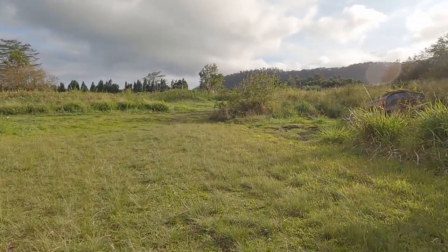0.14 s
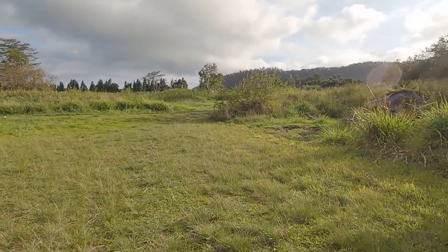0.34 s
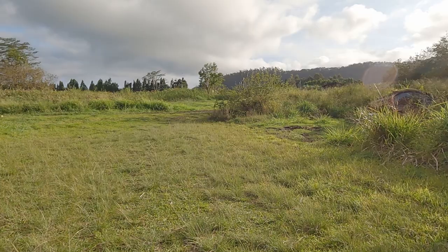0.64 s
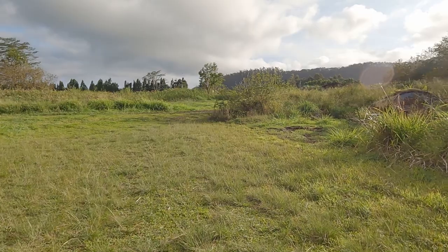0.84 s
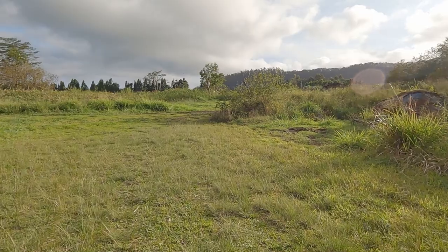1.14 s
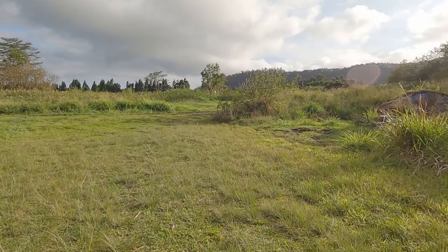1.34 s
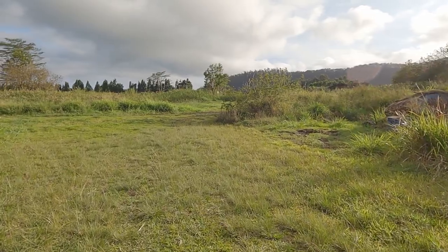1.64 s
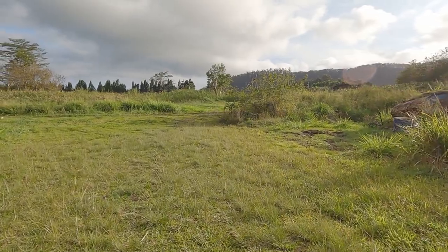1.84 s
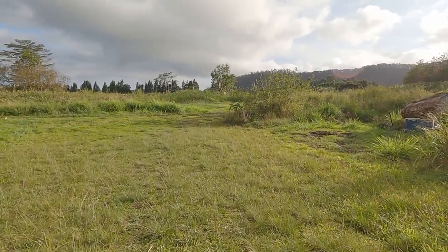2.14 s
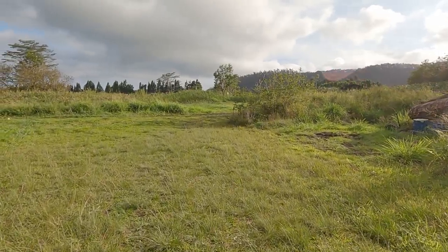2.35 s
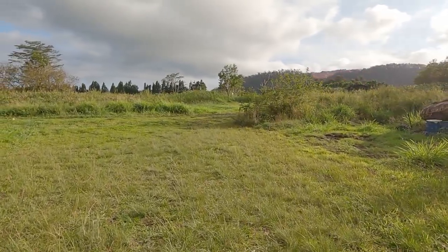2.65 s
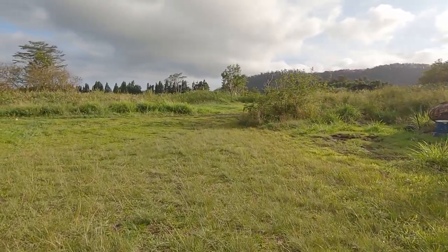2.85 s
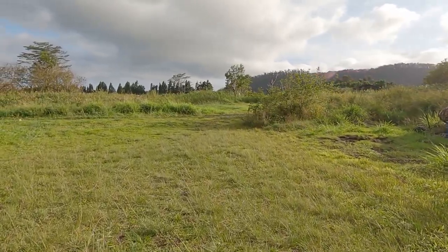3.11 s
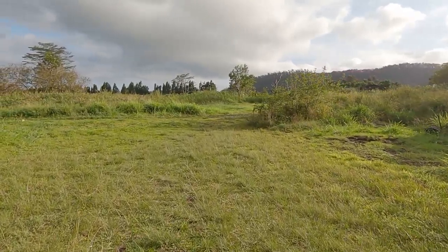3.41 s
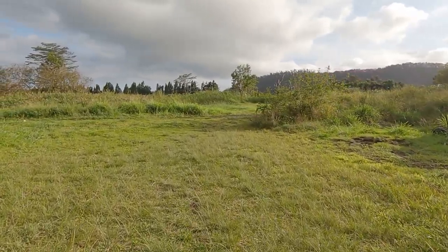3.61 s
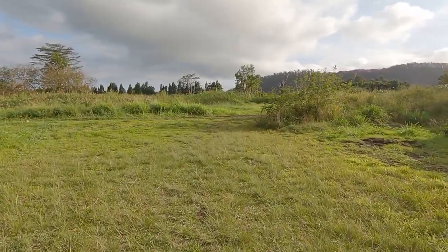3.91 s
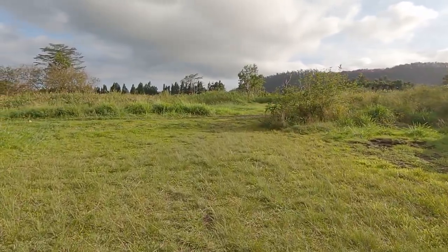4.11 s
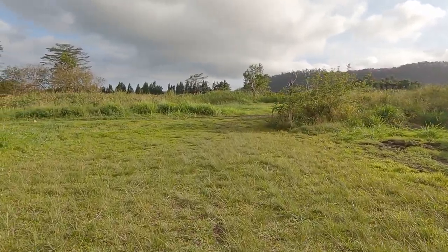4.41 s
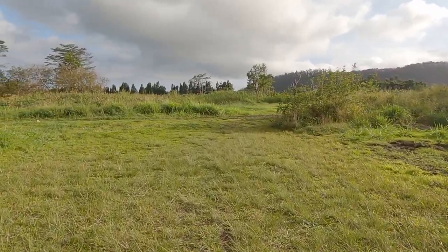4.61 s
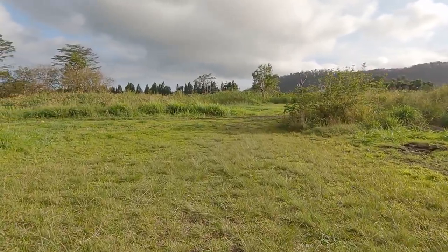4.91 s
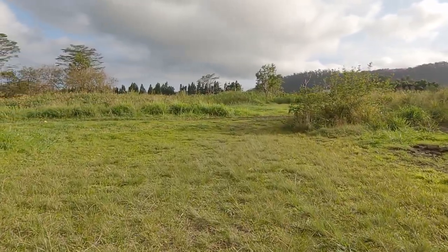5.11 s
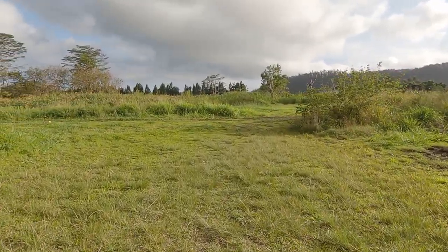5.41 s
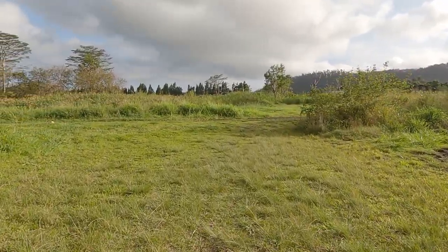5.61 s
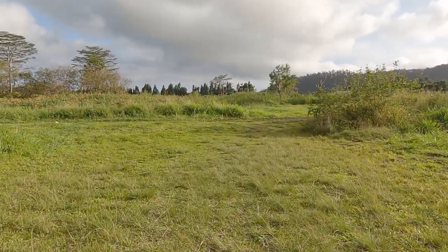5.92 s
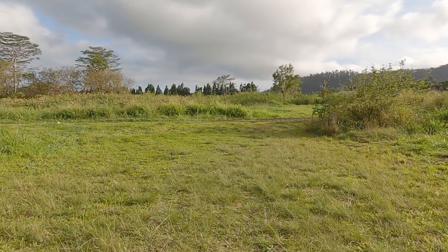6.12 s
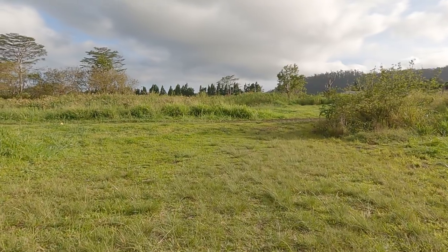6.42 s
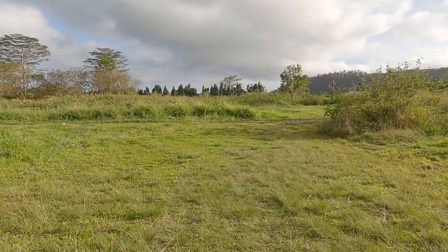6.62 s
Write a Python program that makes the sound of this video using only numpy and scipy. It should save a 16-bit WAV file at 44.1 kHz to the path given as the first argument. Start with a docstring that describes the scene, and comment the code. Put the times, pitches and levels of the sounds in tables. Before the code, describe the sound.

Someone walks through dry grass with steady swishes and small crackles while songbirds whistle and a cricket trills; a tuft crunches with a sharp click.

```python
"""Grassy field: a walker crosses it with a small camera. Legs swish through blades (shaped noise and grains),
stems crackle, tick and snap (damped tones), a dry tuft is crushed and one hard click sounds.
Footfalls sway the handle and bumps thud in the body (decaying sines).
Songbirds whistle gliding sines to the right, with chirps and hoarse far calls; a cricket trills in
short tones. A far low hum and a faint air hiss (filtered noise) lie under it all."""
import sys
import numpy as np
from scipy import signal
from scipy.fft import rfft, irfft, next_fast_len
from scipy.io import wavfile
from scipy.ndimage import uniform_filter1d, map_coordinates

SR = 44100
rng = np.random.default_rng(int(sys.argv[2]) if len(sys.argv) > 2 else 0)


def undo_db(level):
    """Turn decibels back into plain size, where 20 dB means ten times bigger."""
    steps = np.asarray(level, float) / 20
    return 10 ** steps


def store_wav(level_fs):
    """Save 16-bit WAV to argv[1]."""
    pcm = np.round(np.clip(np.atleast_2d(level_fs), -1, 1) * 32767)
    wavfile.write(sys.argv[1], SR, pcm.T.astype(np.int16))


N = 297675
T = np.arange(N) / SR


def unit(x):
    """Scaled to rms 1."""
    return x / np.sqrt(np.mean(x ** 2) + 1e-20)


def along(points, hz):
    """(f/Hz, value) points read on a log axis."""
    f, v = np.transpose(points)
    return np.interp(np.log(hz + 1), np.log(f + 1), v)


def curves(rows):
    """One value per sample for each column after the time."""
    s, *cols = np.transpose(rows)
    return [np.interp(T, s, c) for c in cols]


def wobble(knots_per_s):
    """Smooth random curve."""
    knots = rng.standard_normal(int(N * knots_per_s / SR) + 4)
    return map_coordinates(knots, [T * knots_per_s])


def filtered(x, response):
    """x times a complex response of frequency."""
    m = next_fast_len(N + 8192)
    spectrum = rfft(x, m) * response(np.fft.rfftfreq(m, 1 / SR))
    return irfft(spectrum, m)[..., :N]


def shaped_noise(spectrum):
    """Two independent noises with the spectrum (f/Hz, level/dB)."""
    return filtered(rng.standard_normal((2, N)), lambda hz: undo_db(along(spectrum, hz)))


def placed(x, left_db, lag_us):
    """One source at both ports: left louder by left_db and late by lag_us."""
    def half(hz):
        return undo_db(left_db / 2) * np.exp(-1j * np.pi * hz * lag_us * 1e-6)

    return filtered(x, lambda hz: np.array([half(hz), 1 / half(hz)]))


def wide(pair, alike, side):
    """Two unrelated sounds mixed to a left-right likeness and balance for each frequency."""
    def turn(hz):
        return np.arccos(np.clip(along(alike, hz), -1, 1)) / 2

    def lead(hz):  # left port nearer by 12 us
        return along(side, hz) * np.log(10) / 20 + 2j * np.pi * hz * 12e-6

    a, b = filtered(pair, lambda hz: np.array([np.cos(turn(hz)), np.sin(turn(hz))]))
    return filtered(np.array([a + b, a - b]), lambda hz: np.exp(np.outer([.5, -.5], lead(hz))))


def add(x, s, piece):
    """Adds a piece into x from time s."""
    i = round(s * SR)
    x[..., i:i + piece.shape[-1]] += piece[..., :N - i]


# hum spectrum before scaling: [f/Hz, level/dB]
HUM_SPECTRUM = [(8.8, -50), (15, -21), (43, 0.5), (91, -29), (140, -2), (184, 2.5), (318, -4), (700, -17),
                (910, -40), (1540, -120)]
# mean hum level: [t/s, level/dB]
HUM_LEVEL = [(0, -60.5), (.7, -64.5), (1.05, -55.5), (1.4, -63.5), (2.1, -65), (2.4, -58.5), (3.25, -65),
             (3.7, -57.5), (4.7, -65.5), (5.1, -59), (5.85, -63), (6.3, -56.5), (6.75, -62.5)]


def hum():
    """Far hum: low noise reaching the right port early, with an opposed, unrelated part at the two ports."""
    a, b = shaped_noise(HUM_SPECTRUM)
    pair = unit(placed(a, left_db=-11.5, lag_us=1100) + .65 * np.array([b, -b]))
    return undo_db(curves(HUM_LEVEL)[0] + 2.06 * wobble(9)) * pair


SWELL_DB, FADE_DB = 8.5, 7.5  # rise of a note to its peak, fall from it


def whistles(notes, flutter_db, rough_hz):
    """Each note is a gliding sine with soft ends, unsteady from the air it crosses."""
    out = np.zeros(N)
    flutter = undo_db(flutter_db * (wobble(70) + 0.46 * wobble(25)))
    drift_hz = rough_hz * wobble(150)
    for s, length, db, hz, peak in notes:
        t = T[:round(length * SR)]
        place = t / length
        glide_hz = map_coordinates(np.array(hz, float), [place * (len(hz) - 1)], mode="nearest")
        pitch_hz = glide_hz + drift_hz[round(s * SR):][:len(t)]
        peak = np.clip(peak, .02, .98)
        level_db = np.interp(place, [0, peak, 1], [db - SWELL_DB, db, db - FADE_DB])
        ends = np.clip(np.minimum(t, length - t) / 0.0026, 0, 1)
        tone = np.sin(2 * np.pi * np.cumsum(pitch_hz) / SR)
        add(out, s, np.sqrt(2) * ends * undo_db(level_db) * tone)
    return out * flutter


def midway(calls):
    """Calls given a peak just past the middle."""
    return [(*row, 0.56) for row in calls]


# songbird notes: [t/s, length/s, peak level/dB, f/Hz at even steps, place of peak 0-1]
SONG_NOTES = [(0, .21, -47.5, [2030, 2250, 2496, 2655, 2713], .75),
              (.28, 0.15, -49, [2670, 2615, 2426, 2465, 2570], 0.38),
              (.482, 0.13, -49, [3260, 3205, 3130, 3070, 3500], 0.4),
              (.73, 0.36, -48, [1804, 1953, 2263, 2560, 2678, 2690], 0.73),
              (1.195, .155, -49.5, [2540, 2470, 2366, 2461, 2580], 0.15),
              (1.4, 0.1, -44, [3300, 3170, 2920], 0.6), (1.525, .045, -51, [3080, 3170], .5),
              (1.58, .12, -55, [3230, 3480, 3480, 3400], .5),
              (1.66, .31, -47, [1739, 1887, 2022, 2350, 2574, 2696], 1),
              (2.5, .12, -54, [1990, 1870, 1833, 2440], .5), (2.62, .12, -53.5, [2560, 2720, 2700], 0.56),
              (2.8, 0.18, -43.5, [2460, 2710, 2780, 2800, 2880], 0.22),
              (2.845, .105, -52, [1967, 1850, 1790, 2450], .6), (2.98, 0.097, -48, [2640, 2790, 2810],
              0.46), (3.115, 0.097, -50.5, [1830, 1950, 1890, 1720], .7),
              (3.34, 0.092, -43.5, [2790, 2896, 3010, 3045, 3230], .3), (3.48, .045, -58, [3071, 3760], .5),
              (3.545, .07, -51, [3800, 3860], .8), (3.62, .09, -46, [3750, 3290, 3150, 3130], 1),
              (3.645, 0.16, -51.5, [2030, 2007, 1825, 1730, 1640], 0.13),
              (3.87, 0.088, -47.5, [1956, 2480, 2960, 3313], .8),
              (3.92, .26, -50, [2268, 2227, 2180, 2190, 2125], 0.55), (4.255, .03, -51, [3400, 3150], 0.3),
              (4.34, 0.32, -48, [2590, 2675, 2687, 2560, 2530], 0.64),
              (4.89, .13, -46, [2415, 2430, 2180, 1955, 1815], 0.14),
              (5.745, 0.22, -46.5, [2694, 2560, 2514, 2600, 2695, 2910], 0.42),
              (5.965, 0.16, -48, [3105, 2868, 2880, 2833, 2770], 0.02),
              (6.17, .26, -53.5, [3050, 3010, 3040, 3100, 3150], 0.24),
              (6.18, .18, -44.5, [2330, 2590, 2525, 2340, 2010, 1760], .25),
              (6.43, .19, -48.5, [3130, 3126, 3135, 3100, 3430], .7),
              (6.515, 0.088, -49.5, [2124, 2650, 3100, 3662], .8)]


def song():
    """Songbirds: long gliding whistles."""
    return whistles(SONG_NOTES, flutter_db=2.0, rough_hz=25.2)


# far calls: [t/s, length/s, peak level/dB, f/Hz at even steps]
FAR_CALLS = [(.27, 0.056, -57, [3200, 3350, 3700]), (.59, 0.068, -56, [3420, 3600, 3300]),
             (.94, .1, -57, [3400, 3550, 3710]), (2.2, 0.123, -59, [2350, 2400, 2330]),
             (3.27, .06, -52, [2900, 2850]), (5.136, 0.047, -52.5, [2640, 2440]),
             (5.21, .12, -53, [2350, 2670, 2600]), (5.329, 0.071, -58, [3100, 2933]),
             (5.6, 0.093, -59.5, [2500, 2040, 2020]), (6.299, .15, -59.5, [3190, 3230, 3000])]


def far_calls():
    """Hoarse calls blurred by distance: strong pitch drift, little flutter."""
    return whistles(midway(FAR_CALLS), flutter_db=0.8, rough_hz=89.4)


# small birds ahead: [t/s, length/s, peak level/dB, f/Hz at even steps]
CHIRP_NOTES = [(.3, 0.077, -55.5, [4480, 3420]), (0.512, .04, -54, [4200, 4000]),
               (0.961, 0.066, -58, [5700, 5000, 5300]), (1.047, .075, -52.5, [4140, 4100]),
               (1.13, .05, -65, [4300, 4100]), (1.181, .06, -52, [7100, 5000, 4200, 4000]),
               (1.599, .065, -52.5, [4940, 4400, 3600]), (1.678, 0.027, -54, [3800, 4100]),
               (1.882, 0.061, -63, [4300, 4000, 3900]), (2.307, 0.043, -59.5, [4100, 2800]),
               (2.405, .025, -66, [7300, 5165]), (2.448, .03, -60, [4350, 4000]),
               (2.546, 0.078, -57.5, [4260, 4200, 4420]), (2.899, .019, -53.5, [6400, 7400, 7800]),
               (3.026, 0.062, -60, [3446, 3550, 3400]), (3.523, 0.092, -56.5, [4452, 4440, 4400, 3900]),
               (4.922, 0.032, -50.5, [2300, 3050, 3140]), (5.031, .022, -54.5, [7050, 7500, 7300]),
               (6.14, 0.037, -58, [4200, 4500, 4800]), (6.336, .045, -56, [4700, 4150, 4000]),
               (6.404, 0.047, -59, [4220, 4120]), (6.5, .03, -64, [6450, 6400]),
               (6.538, 0.095, -59, [5280, 5200, 4400, 3930])]


def chirps():
    """Small birds: thin, high, short glides."""
    return whistles(midway(CHIRP_NOTES), flutter_db=2.0, rough_hz=30.4)


# echoes off shrubs: [f/Hz, t60/s]
FIELD_T60 = [(1000, 0.21), (3000, 0.5), (8000, 0.11)]


def echoes(x):
    """The shrubs' answer, 400 samples late, each frequency dying at its own speed."""
    hz, t, z = signal.stft(rng.standard_normal((2, SR // 2)), SR, nperseg=256)
    decay = undo_db(-60 * t / along(FIELD_T60, hz)[:, None])
    tail = signal.istft(z * decay, SR, nperseg=256)[1]
    late = np.pad(x, (400, 0))[None]
    return signal.fftconvolve(late, tail / np.linalg.norm(tail[0]), axes=1)[:, :N]


def birds():
    """Three kinds of voice from their own directions, in the echoes of the field."""
    singing, far, chirping = song(), far_calls(), chirps()
    direct = placed(singing, left_db=-4.5, lag_us=55)
    direct = direct + placed(chirping, left_db=-2.5, lag_us=10.5)
    direct = direct + placed(far, left_db=-7, lag_us=18)
    return direct + undo_db(-10.5) * echoes(singing + chirping + 2.5 * far)


# trill: [t/s, wing f/Hz, stroke level/dB]
CRICKET_TRILL = [(0, 5620, -57.5), (1, 5580, -58.5), (1.8, 5610, -59.5), (2.5, 5590, -59), (2.9, 5650, -62),
                 (3.4, 5600, -57), (3.74, 5600, -56.5), (3.8, 5680, -78), (4.2, 5600, -60),
                 (4.3, 5580, -54.5), (5.9, 5670, -56.5), (6.05, 5690, -56), (6.25, 5800, -55.5),
                 (6.75, 5920, -55)]


def cricket():
    """Each wing stroke is a short tone that sinks in pitch; a lower neighbour keeps the same beat."""
    hz, db = curves(CRICKET_TRILL)
    beat = (T * 41.9 + .2) % 1 - .5  # 41.9 strokes/s
    closing = np.exp(-(beat / .18) ** 2)
    stroke = closing * undo_db(db + 1.6 * wobble(32))

    def tone(f):
        pitch_hz = f * (1 - 0.071 * beat) + 30 * wobble(200)
        return np.sin(2 * np.pi * np.cumsum(pitch_hz) / SR)

    both = tone(hz) + undo_db(-10) * tone(.87 * hz)
    return placed(stroke * both, left_db=-2.0, lag_us=18)


def crackle(count, spread_db):
    """Blades flicking free: tiny damped tones of random pitch, a few bigger than the rest."""
    draw = rng.random((count, 3))
    hz = 800 * 18 ** draw[:, 1:2]
    size = hz * undo_db(np.minimum(-spread_db * np.log(1 - draw[:, 2:]), 14))
    t = T[:260]
    grain = size * np.sin(2 * np.pi * hz * t) * t * np.exp(-t / (.0001 + 1.1 / hz))
    at = (draw[:, :1] * N).astype(int) + np.arange(len(t))
    return unit(np.bincount(at.ravel(), grain.ravel())[:N])


def patchy(pair, patchy_db):
    """Random patches of gain in time and pitch, as single clumps of grass answer in turn."""
    z = signal.stft(pair, nperseg=512)[2]
    patches = uniform_filter1d(rng.standard_normal(z.shape[1:]), size=4, axis=0)
    patches = uniform_filter1d(patches, size=6, axis=1)
    return signal.istft(z * undo_db(patchy_db * unit(patches)), nperseg=512)[1][:, :N]


# left-right likeness: [f/Hz, correlation]
GRASS_ALIKE = [(400, .75), (1400, .94), (5000, .92), (8000, .8), (12000, .5)]
# balance: [f/Hz, left over right/dB]
GRASS_SIDE = [(400, 1), (1300, 4.5), (4400, 1.5), (8000, 5), (12000, 10)]


def rustle():
    """Hiss and crackle of grass in uneven clumps, before spectrum and level."""
    raw = 1.76 * rng.standard_normal((2, N)) + [crackle(count=9000, spread_db=3.0) for _ in range(2)]
    return wide(patchy(raw, patchy_db=2) * undo_db(1.7 * wobble(40)), GRASS_ALIKE, GRASS_SIDE)


# leg sweeps: [middle t/s, half length/s, low rustle level/dB, bright over low/dB]
LEG_SWEEPS = [(0.072, .14, -49.5, -5), (0.295, 0.11, -54.5, -13), (.55, 0.044, -62, -11),
              (0.68, 0.11, -53.5, -5.5), (0.829, 0.099, -51.5, -6.5), (0.966, 0.051, -61, -0.5),
              (1.12, 0.089, -61, -11), (1.244, 0.047, -53.5, -8), (1.357, 0.081, -52.5, -1.5),
              (1.536, 0.1, -52.5, -7.5), (1.951, 0.023, -53.5, -11.5), (2.03, 0.057, -47, -10),
              (2.175, .07, -54, -7), (2.38, 0.13, -55, -20), (2.55, 0.052, -52.5, -12),
              (2.686, 0.086, -48, -10.5), (2.843, 0.084, -52, -12.5), (3.214, 0.081, -49.5, -18.5),
              (3.318, 0.049, -46, -13), (3.489, 0.078, -51, -9.5), (3.673, 0.093, -57, -12.5),
              (3.881, 0.056, -52.5, -11), (3.98, 0.065, -47.5, -8), (4.17, 0.09, -49.5, -13.5),
              (4.483, .08, -57, -16.5), (4.62, 0.084, -49, -11.5), (4.755, .08, -49, -2.5),
              (4.917, 0.088, -54, -9), (5.081, 0.1, -56, -11.5), (5.271, 0.069, -49, -10.5),
              (5.42, 0.058, -57, -9), (5.591, .035, -54.5, -4), (5.68, 0.08, -56.5, -24),
              (5.844, 0.042, -48.5, -17.5), (5.919, 0.055, -46, -14.5), (6.094, 0.088, -52.5, -7.5),
              (6.29, 0.086, -53.5, -11.5), (6.51, 0.18, -61, -6), (6.74, 0.076, -53, -13)]
# rustle between sweeps: low, middle, bright [level/dB]
REST_DB = [-64.5, -70.5, -78]
MIDDLE_DB, MIDDLE_FOLLOWS = 2.5, 0.55  # middle over low, share of the brightness it follows


def sweeps():
    """Gain of low, middle and bright rustle: bell-shaped sweeps over a quiet rest, summed as powers."""
    s, half, db, bright_db = np.transpose(LEG_SWEEPS)
    peaks = undo_db([db, db + MIDDLE_DB + MIDDLE_FOLLOWS * bright_db, db + bright_db]) ** 2
    t = T[::64]
    bells = np.exp(-2 * ((t - s[:, None]) / half[:, None]) ** 2)
    power = undo_db(np.array(REST_DB))[:, None] ** 2 + peaks @ bells
    return [np.interp(T, t, np.sqrt(p)) for p in power]


# blade spectrum before scaling: [f/Hz, level/dB]
BLADE_SPECTRUM = [(200, -36), (350, -8), (620, -10.5), (860, -15.5), (1000, -6), (1400, -3), (2000, -4.5),
                  (3400, -3), (5000, -5.5), (7500, -13.5), (9500, -22), (10800, -30), (12200, -21),
                  (14500, -39.5), (15500, -40)]


def swish(raw):
    """Legs through blades: low, middle and bright rustle swell with the stride."""
    low = [(1700, 1), (3500, 0)]
    middle = [(1700, 0), (3500, 1), (5000, 1), (7000, 0)]
    bright = [(5000, 0), (7000, 1)]
    out = 0
    for gain, share in zip(sweeps(), [low, middle, bright]):
        part = unit(filtered(raw, lambda hz: undo_db(along(BLADE_SPECTRUM, hz)) * along(share, hz)))
        out = out + gain * undo_db(1.52 * wobble(25)) * part
    return out


# air spectrum before scaling: [f/Hz, level/dB]
AIR_SPECTRUM = [(410, -24), (700, -34), (1650, 1.5), (4470, -2.5), (5500, 0), (8430, -22.5), (12300, -21),
                (14500, -27), (15500, -55)]


def air():
    """Faint hiss of open air: noise as wide as the grass, wavering slowly."""
    pair = wide(rng.standard_normal((2, N)), GRASS_ALIKE, GRASS_SIDE)
    pair = unit(filtered(pair, lambda hz: undo_db(along(AIR_SPECTRUM, hz))))
    return undo_db(-62 + 1.4 * wobble(2.9)) * pair


def crack(hz, turns):
    """Short bright tone in a bell 1 ms into the piece, turns cycles to its 1/e point."""
    t = T[:900] - .001
    return np.sin(2 * np.pi * hz * t) * np.exp(-(t * hz / turns) ** 2)


# louder stems: [t/s, ring f/Hz, ring level/dB, crack f/Hz, crack level/dB]
STEM_SNAPS = [(0.1697, 1360, -25, 3310, -38), (0.6062, 1600, -41, 3370, -39), (0.618, 1530, -39, 3730, -35),
              (1.0109, 1090, -33, 3690, -50), (1.118, 1770, -30.5, 4120, -50),
              (1.938, 1640, -34.5, 3370, -35), (2.185, 1080, -38, 5000, -45.5),
              (2.3258, 1770, -34.5, 3600, -44.5), (2.4296, 1740, -28, 3410, -50),
              (2.5255, 1450, -35, 3300, -35), (2.5475, 1830, -37.5, 4260, -37),
              (2.7557, 1340, -24, 3180, -28.5), (3.1433, 1910, -36, 3610, -50),
              (3.4474, 1306, -36, 5620, -53), (3.9435, 1560, -31.5, 3320, -32),
              (3.982, 1280, -35, 5050, -37), (4.3162, 1530, -42.5, 6200, -29),
              (4.6866, 1740, -35, 2600, -36), (4.7504, 1430, -45.5, 4980, -35),
              (4.799, 1460, -34, 6820, -24.5), (4.9297, 1205, -55, 5740, -36),
              (5.013, 1700, -30, 5590, -45), (5.1, 1760, -32.5, 4870, -47), (5.117, 1680, -29.5, 3320, -40),
              (5.226, 1700, -39, 3610, -37), (5.466, 1530, -45, 3700, -30.5),
              (5.4753, 1670, -36, 6200, -16), (5.4824, 1500, -39, 3340, -24),
              (5.4928, 1280, -25, 3260, -20), (5.504, 1600, -23.5, 3740, -37.5),
              (5.513, 1200, -26, 4630, -26), (5.5216, 1460, -19.5, 4030, -24),
              (5.5382, 1450, -23.5, 3920, -27), (5.5954, 1060, -54, 3940, -40),
              (5.7549, 1100, -37.5, 2900, -36.5), (5.8137, 1520, -35, 3000, -50),
              (5.883, 1590, -28, 3770, -39)]
TICKS_DB, TICK_CRACK_DB = -45, -2  # loudest random tick: ring level, crack over ring


def snaps():
    """Each snap or random tick is a short bright crack and a few cycles of a hollow stem ringing."""
    out, t = np.zeros(N), T[:900]
    ticks = []
    for a, b, c, d in rng.random((24, 4)):
        tick_db = TICKS_DB - 6 * c
        ticks.append((a * T[-1], 1100 + 800 * b, tick_db, 3300 + 2400 * d, tick_db + TICK_CRACK_DB))
    for s, ring_hz, ring_db, crack_hz, crack_db in STEM_SNAPS + ticks:
        ring = np.sin(2 * np.pi * ring_hz * t) * np.exp(-t / 0.0018) * (1 - np.exp(-t / 0.00027))
        bright = crack(crack_hz, turns=1.07) + .1 * crack(12200, turns=2.5)
        add(out, s, undo_db(ring_db) * ring + undo_db(crack_db) * bright)
    return placed(out, left_db=5.0, lag_us=-12)


# footfalls felt through the handle: [t/s, level/dB]
FOOTFALLS = [(.226, -44), (.779, -61), (.87, -50), (1.554, -48), (1.649, -50), (2.21, -46.5), (2.899, -56),
             (3.524, -43.5), (4.179, -45.5), (4.823, -50.5), (5.519, -44), (6.159, -45.5)]
# rumble spectrum before scaling: [f/Hz, level/dB]
SHUDDER_SPECTRUM = [(15, -20), (30, 0), (55, -2), (90, -40), (200, -90)]
SWAY_HZ, SHUDDER_DB, SHUDDER_S = 16.8, -9, .12  # sway pitch; rumble re footfall level, its decay


def footfalls():
    """Each footfall sways the handle in a damped slow sine and leaves a decaying rumble."""
    out, t = np.zeros((2, N)), T[:SR // 3]
    a, b = unit(shaped_noise(SHUDDER_SPECTRUM))
    rumble = np.array([a, .5 * a + .5 * b])
    shudder = np.exp(-t / SHUDDER_S) * (1 - np.exp(-t / .01))
    sway = np.sin(2 * np.pi * SWAY_HZ * t) * np.exp(-(t / 0.11) ** 2) * (1 - np.exp(-t / 0.0062))
    for s, db in FOOTFALLS:
        add(out, s, undo_db(db + SHUDDER_DB) * rumble[:, round(s * SR):][:, :len(t)] * shudder)
        add(out, s, undo_db(db) * sway * np.array([[1.2], [.8]]))
    return out


# bumps on the camera body: [t/s, level/dB, start f/Hz, deep thud re level/dB]
BODY_BUMPS = [(.935, -46, 300, -12), (1.495, -51, 304, -8), (1.735, -47, 404, -7), (2.858, -29.5, 480, 1.5),
              (4.289, -35.5, 460, 2.5), (4.72, -40, 1110, -20), (5.38, -51.5, 300, -10),
              (6.27, -43.5, 700, -23)]


def bumps():
    """A bump spreads through the body, high pitches first, unlike at the two ports."""
    out, t = np.zeros((2, N)), T[:SR // 3]
    for s, db, hz, deep_db in BODY_BUMPS:
        def wave(turns, life_s):
            return -np.sin(2 * np.pi * turns * np.log(1 + t * hz / turns)) * np.exp(-t / life_s)

        deep = undo_db(deep_db) * wave(0.735, life_s=0.038)
        quick = wave(1.2, life_s=0.0051)
        left = deep + 0.85 * wave(0.78, life_s=0.0036)
        right = .5 * deep + 1.97 * quick
        blow = undo_db(db) * (1 - np.exp(-t / 0.00084))
        add(out, s, blow * np.array([left, right]))
        add(out, s + 0.00457, blow * quick * np.array([[.4], [1.1]]))  # the contact bounces once
    return out


# tuft spectrum before scaling: [f/Hz, level/dB]
TUFT_SPECTRUM = [(290, -55), (500, -20), (863, -21), (968, -10.5), (1450, -10), (1880, -8), (7340, -12.5),
                 (12100, -27), (14600, -36), (15500, -88)]
CRUSH_S, CRUSH_DB, CRUSH_END_S = 5.498, -30.5, 5.562  # loudest moment, its level, start of steep end
CRUSH_RISE_DB_PER_S, CRUSH_FALL_DB_PER_S = 387, 144


def crush(raw):
    """Dry tuft crushed under the shoe: rough rustle with a steep rise and a slower fall."""
    rough = np.roll(raw, SR, axis=1) * undo_db(3.7 * wobble(260))  # shifted 1 s: unlike the swish
    tuft = unit(filtered(rough, lambda hz: undo_db(along(TUFT_SPECTRUM, hz))))
    late = T - CRUSH_S
    level_db = CRUSH_DB + np.minimum(CRUSH_RISE_DB_PER_S * late, -CRUSH_FALL_DB_PER_S * late)
    level_db = level_db - 700 * np.maximum(T - CRUSH_END_S, 0)
    return undo_db(level_db) * tuft


# hard dry click: [t/s, level/dB, f/Hz, left over right/dB]
DRY_CLICK = (5.5762, -13.5, 4900, 2.2)


def click():
    """One hard dry click: a crack with no ring."""
    s, db, hz, left_db = DRY_CLICK
    out = np.zeros(N)
    add(out, s - .001, undo_db(db) * crack(hz, turns=1.1))
    return placed(out, left_db, lag_us=-8)


def scene():
    """Everything at the two microphone ports."""
    raw = rustle()
    field = hum() + birds() + cricket() + swish(raw) + air()
    return field + snaps() + footfalls() + bumps() + crush(raw) + click()


def roll_off(x):
    """The treble ends steeply here."""
    return signal.sosfilt(signal.butter(12, 15680, fs=SR, output="sos"), x)


def record(dry):
    """The finished two-port mix as the camera stores it."""
    return roll_off(dry)


dry = scene()
out = record(dry)
store_wav(out)
```